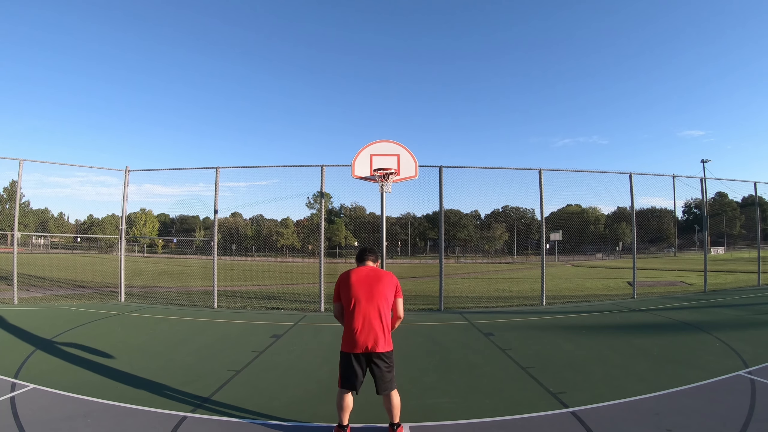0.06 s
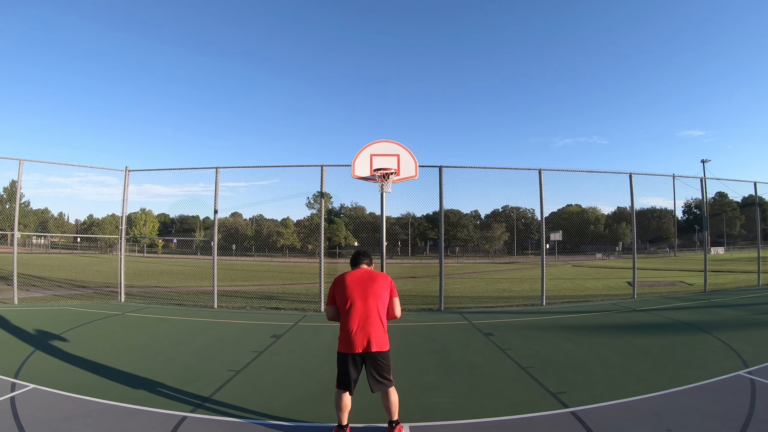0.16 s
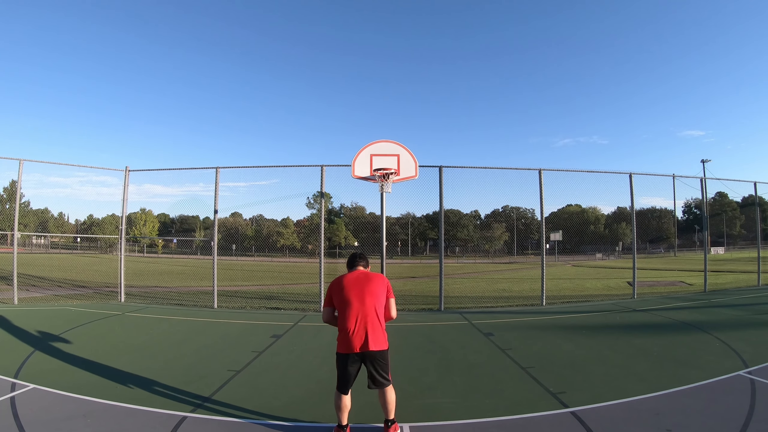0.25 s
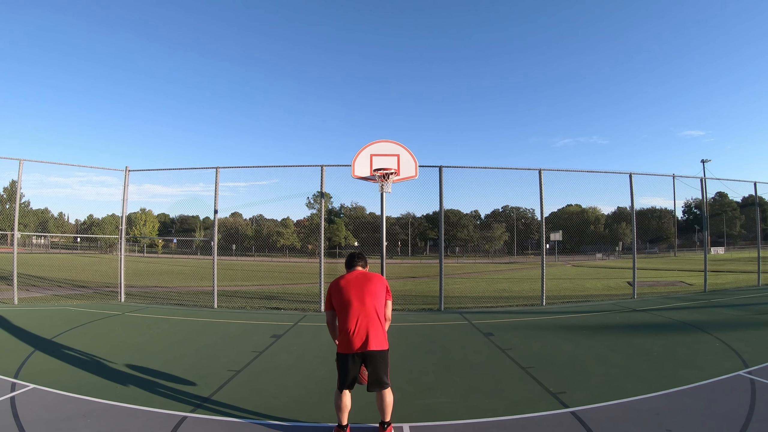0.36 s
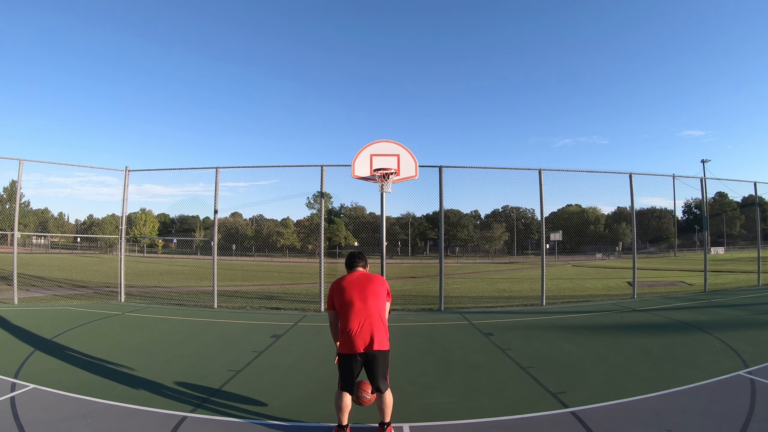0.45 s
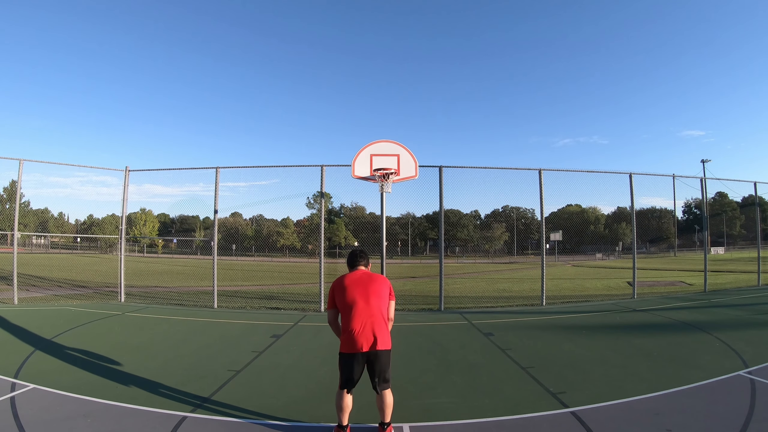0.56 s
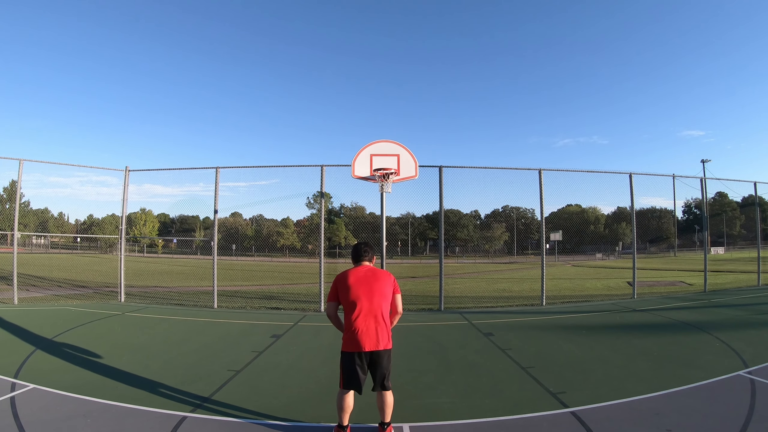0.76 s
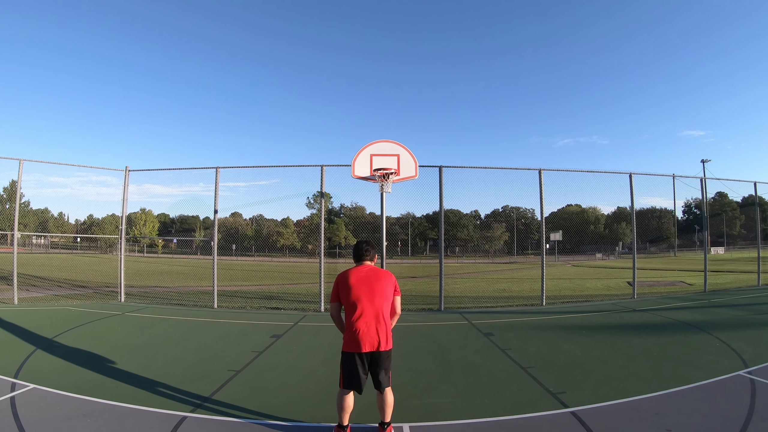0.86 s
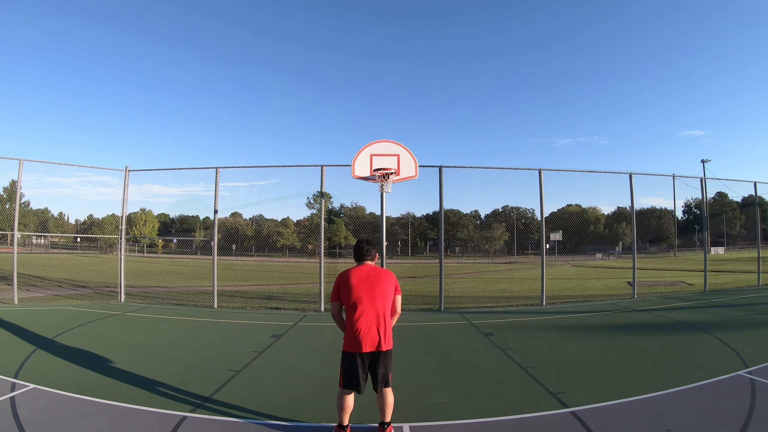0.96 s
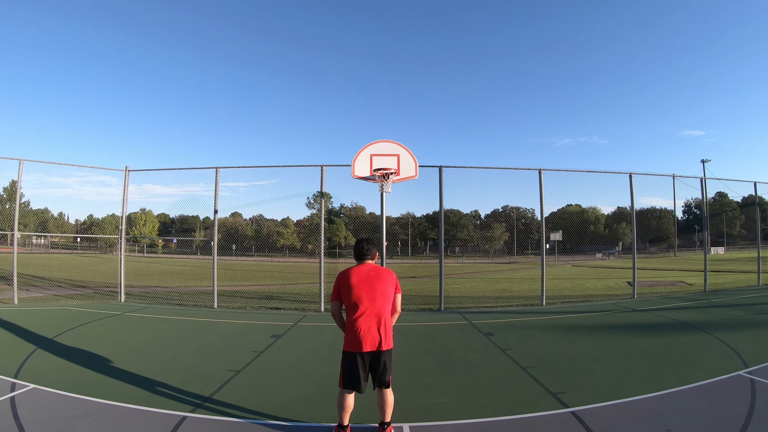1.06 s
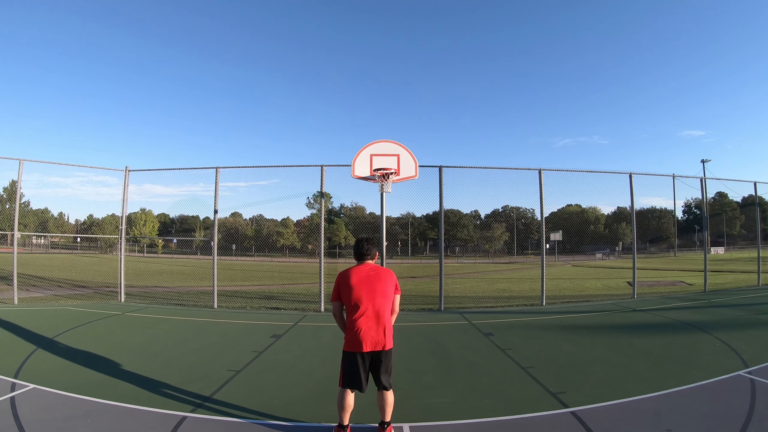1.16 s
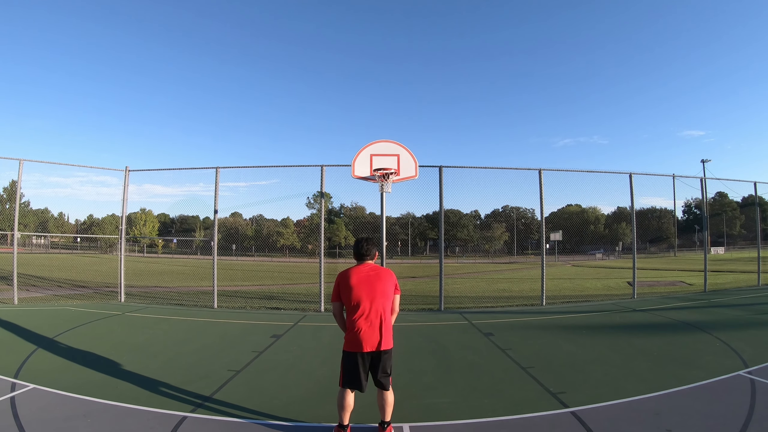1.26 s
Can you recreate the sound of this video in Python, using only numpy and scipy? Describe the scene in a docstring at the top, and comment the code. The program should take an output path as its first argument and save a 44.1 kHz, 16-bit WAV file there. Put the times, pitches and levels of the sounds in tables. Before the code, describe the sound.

A basketball bounces twice on a hard outdoor court a few metres away, at about 0.1 and 0.6 seconds. Each bounce is a sharp slap with a low thump, a faint hollow ping and a slight echo. Light wind rumbles and distant traffic hisses throughout. A very faint bird whistles in the first 0.3 seconds, and the player's movements rustle softly between and after the bounces.

```python
"""A sharp slap over light wind: a basketball bounces twice on a hard outdoor court, a few metres away.
Each bounce layers the slap with a two-cycle thump as the ball squashes and recovers, a buzz of the
skin and a faint ping of the air inside. Court and fence scatter the hit; a far surface returns the slap.
Behind it the wind rumbles, distant traffic hisses, a small bird whistles and the player softly shifts."""
import sys
import numpy as np
from scipy import signal
from scipy.fft import rfft, irfft
from scipy.io import wavfile

SR = 44100
rng = np.random.default_rng(int(sys.argv[2]) if len(sys.argv) > 2 else 0)


def output_pcm(signal):
    """Save a mono or channel-first signal as 16-bit PCM at the path in sys.argv[1].

    Samples are clipped to [-1, 1] before scaling.
    """
    pcm = np.clip(np.atleast_2d(signal).T, -1, 1) * 32767
    wavfile.write(sys.argv[1], SR, np.round(pcm).astype(np.int16))


N = 57330
T = np.arange(N) / SR

# Wind rumble, traffic drone and traffic hiss. Each row: frequency in Hz, relative noise density in dB.
WIND_COLOUR = [(15, -14), (38, 2.5), (62, 0.5), (100, -5), (165, -11), (230, -19.5), (320, -31.5),
               (500, -37.5), (900, -51), (3000, -93)]
DRONE_COLOUR = [(60, -10), (170, 4.5), (230, -1.5), (330, -9.5), (500, -13), (800, -19), (2000, -60.5)]
HISS_COLOUR = [(100, 3), (450, -22.5), (700, -7.5), (1100, 4), (1600, 2.5), (2200, -1.5), (3100, -9.5),
               (4000, -21), (5500, -28.5), (6600, -48.5), (8000, -37.5), (10000, -69), (15000, -48.5)]
# Fader moves for the gusts and the fading drone. Each row: time in seconds, level in dB.
WIND_FADER = [(0, -34.5), (.17, -38), (.26, -35), (.35, -32.5), (.45, -40.5), (.7, -33.5), (.87, -38.5),
              (1.3, -40)]
DRONE_FADER = [(0, -41), (.33, -44.5), (.6, -48.5), (.9, -56), (1.3, -53.5)]
# Bird calls. Each row: start and length in seconds, opening and top pitch in Hz, level in dB.
BIRD_WHISTLES = [(-.04, .14, 7300, 7850, -72), (.18, .15, 6650, 7100, -80)]
# Soft scuffs of shoes and hands. Each row: centre and width in seconds, level in dB.
RUSTLE_SWELLS = [(.36, .025, -69), (.645, .014, -65), (.845, .016, -68), (.88, .012, -68)]
# Those rustles, the ball's friction on the ground, and the reflections off court and fence.
# Each row: frequency in Hz, relative noise density in dB.
RUSTLE_COLOUR = [(500, -8.5), (3500, -2), (5500, 3.5), (7000, -13), (9000, -6.5), (11000, -32)]
SCUFF_COLOUR = [(200, 14), (600, -10.5), (1300, 1.5), (2200, -17.5), (3500, -19), (5000, -30.5),
                (7000, -31.5), (14000, -49.5)]
SCATTER_COLOUR = [(150, -12), (400, -2.5), (1200, -4), (3200, 4.5), (5500, 0.5), (8000, 12.5), (12000, 1.5)]
# Tone of the far echo and of the dull pop as the skin buckles. Each row: frequency in Hz, gain in dB.
ECHO_EQ = [(300, -14), (1200, -10), (2400, -3), (3300, 2), (4200, -1), (6000, -2), (8500, 8), (11000, -10)]
BUCKLE_EQ = [(100, -14), (300, -1), (800, 6), (1300, 4.5), (2400, 2), (3600, -6.5), (6000, -22.5),
             (12000, -58)]
# Air modes inside the ball, excited differently as it turns.
# Each row: frequency in Hz, level in dB at the first and at the second bounce, T60 in seconds.
AIR_MODES = [(1061, -52, -58, .4), (1141, -51, -57, .4), (1631, -55, -62, .3), (2130, -58, -56, .35),
             (2708, -62, -56, .35), (2803, -54, -53, .45), (2848, -61, -50, .52), (3176, -54, -60, .3),
             (3250, -62, -50, .22), (3435, -51, -57, .3), (3763, -54, -51, .25), (4334, -68, -61, .3)]
# Damped modes of the skin. Each row: frequency in Hz, relative level in dB, T60 in seconds.
SKIN_MODES = [(224, -31.5, .018), (425.5, -33, 0.069), (810, -41, 0.017), (1082, -36.5, 0.066),
              (1120, -35.5, 0.041), (1440, -27.5, 0.016), (1520, -36, 0.022), (1760, -30, 0.0051),
              (2390, -33, 0.0078), (3250, -29.5, .012), (3440, -48.5, 0.024)]
# Touch, buckle and lift-off each jolt the skin. Each row: delay after the slap in seconds,
# gain in dB, low-pass cutoff in Hz, share of the bounce's buckle dB added to that gain.
SKIN_JOLTS = [(.0001, -6, 6000, 0), (.0022, -4, 2600, 1), (.0108, 3, 1450, .3)]
# Tone of the slap, coloured by the spot that lands.
# Each row: frequency in Hz, gain in dB at the first and at the second bounce.
SLAP_EQ = [(203, -13.5, -12), (746, 8, 11.5), (1130, -17.5, 12.5), (1560, 18.5, 14.5), (2020, 5, 16),
           (2060, 8, 10.5), (2313, 15.5, 17), (2420, 9.5, 6.5), (3070, 13.5, 11.5), (3580, 12, 14),
           (3900, 5.5, 8.5), (5730, 1.5, 2.5), (6600, -10.5, -11), (9670, -20.5, -29), (11300, -38, -61),
           (14900, -57.5, -89)]
# The bounces. Each row: start in seconds, slap gain and thump gain in dB, buckle gain and echo send
# in dB (both on top of the slap gain), opening thump pitch in Hz.
BOUNCE_CUES = [(0.071, -1.5, -10.5, -6.5, -25.5, 135), (0.591, -2, -11.5, -5.5, -27.5, 128.4)]

HISS_DB = -48.5
GRAIN_DB, GRAINS_PER_S = 7.5, 190  # roughness of reflections and rustles
SCATTER_DB, SCATTER_DELAY_S, SCATTER_RISE_S, SCATTER_T60_S = -21, .019, .0073, .26
TAIL_DB, TAIL_T60_S = -26, 1.0
ECHO_DELAY_S, SMEAR_DECAY_S, SMEAR_DB = .1988, .004, -1
THUMP_ATTACK_S, THUMP_HOLD_S, THUMP_RELEASE_S, THUMP_SAG_HZ_PER_S = .0033, .0082, .0068, 2000
BUCKLE_DELAY_S, SCUFF_GAIN_DB, SCUFF_S = .0023, -19, .0175
MIC_TOP_HZ, STOPBAND_HZ = 10300, 13000


def from_db(db):
    """Decibels to gain."""
    return 10 ** (np.asarray(db) / 20)


def bin_gains(spectrum):
    """An EQ curve as a gain for each frequency bin."""
    hz, db = np.transpose(spectrum)
    bin_hz = np.arange(N // 2 + 1) * SR / N
    return from_db(np.interp(np.log(bin_hz + 1), np.log(hz), db))


def noise(spectrum):
    """Coloured noise of rms 1."""
    x = irfft(rfft(rng.standard_normal(N)) * bin_gains(spectrum), N)
    return x / x.std()


def grainy_noise(spectrum):
    """Coloured noise in small uneven clumps, rms 1."""
    clumps = np.interp(T * GRAINS_PER_S, np.arange(N), rng.standard_normal(N))
    x = noise(spectrum) * from_db(GRAIN_DB * clumps)
    return x / x.std()


def click(spectrum):
    """The tightest click with this spectrum: a minimum-phase pulse."""
    cepstrum = irfft(np.log(bin_gains(spectrum)), N)
    causal_window = np.r_[1, np.full(N // 2 - 1, 2), np.zeros(N - N // 2)]
    return irfft(np.exp(rfft(cepstrum * causal_window)), N)


def delay(x, seconds):
    """The same sound, later."""
    return np.r_[np.zeros(round(seconds * SR)), x][:N]


def convolve(x, response):
    """A sound played through an impulse response."""
    return signal.fftconvolve(x, response)[:N]


def lowpass(x, hz):
    """A gentle second-order treble roll-off."""
    return signal.sosfilt(signal.butter(2, hz, fs=SR, output="sos"), x + 1e-18)


def decay(t60):
    """A fade that falls 60 dB in t60 seconds."""
    return from_db(-60 * T / t60)


def fader(points):
    """A gain that rides through (seconds, dB) points."""
    return from_db(np.interp(T, *np.transpose(points)))


def ring(modes):
    """Struck modes, each a little stronger or weaker at every blow."""
    return sum(from_db(db + rng.standard_normal()) * np.sin(2 * np.pi * hz * T) * decay(t60)
               for hz, db, t60 in modes)


def traffic():
    """Distant traffic: a low, fading drone under a steady hiss."""
    return fader(DRONE_FADER) * noise(DRONE_COLOUR) + from_db(HISS_DB) * noise(HISS_COLOUR)


def wind():
    """A low rumble that swells with each gust."""
    return fader(WIND_FADER) * noise(WIND_COLOUR)


def bird():
    """Thin whistles that rise and level off."""
    out = np.zeros(N)
    for start, length, start_hz, top_hz, db in BIRD_WHISTLES:
        progress = np.clip((T - start) / length, 0, 1)
        hz = top_hz + (start_hz - top_hz) * (1 - progress) ** 3
        out += from_db(db) * np.sin(np.pi * progress) * np.sin(2 * np.pi * np.cumsum(hz) / SR)
    return out


def rustles():
    """Brief soft swells of friction as the player shifts."""
    swells = sum(from_db(db) * np.exp(-(2 * (T - centre) / width) ** 2)
                 for centre, width, db in RUSTLE_SWELLS)
    return swells * grainy_noise(RUSTLE_COLOUR)


def far_echo(x):
    """A far surface sends back a thin, slightly smeared copy."""
    smear = rng.standard_normal(N) * np.exp(-T / SMEAR_DECAY_S)
    smeared = x + from_db(SMEAR_DB) * convolve(x, smear / np.linalg.norm(smear))
    return delay(convolve(smeared, click(ECHO_EQ)), ECHO_DELAY_S)


def court_scatter(x):
    """A spray of small reflections off court and fence, then a faint long tail."""
    early = grainy_noise(SCATTER_COLOUR) * decay(SCATTER_T60_S) * np.minimum(T / SCATTER_RISE_S, 1)
    early *= from_db(SCATTER_DB) / np.linalg.norm(early)
    tail = noise(SCATTER_COLOUR) * decay(TAIL_T60_S)
    tail *= from_db(TAIL_DB) / np.linalg.norm(tail)
    return convolve(x, delay(early + tail, SCATTER_DELAY_S))


def thump(start_hz):
    """The low end: the ball squashes and recovers in about two cycles, sagging in pitch."""
    corners = np.cumsum([0, THUMP_ATTACK_S, THUMP_HOLD_S, THUMP_RELEASE_S])
    cycles = start_hz * T - THUMP_SAG_HZ_PER_S * T ** 2 / 2
    return -np.sin(2 * np.pi * cycles) * np.interp(T, corners, [0, 1, 1, 0])


def skin(buckle_db):
    """The skin buzzes at each stage of the contact, pops as it buckles and scuffs the ground."""
    buzz = sum(from_db(db + share * buckle_db) * delay(lowpass(ring(SKIN_MODES), cutoff_hz), lag)
               for lag, db, cutoff_hz, share in SKIN_JOLTS)
    pop = from_db(buckle_db) * delay(click(BUCKLE_EQ), BUCKLE_DELAY_S)
    scuff_fade = np.sqrt(np.clip(1 - T / SCUFF_S, 0, 1))
    scuff = from_db(SCUFF_GAIN_DB) * noise(SCUFF_COLOUR) * scuff_fade
    return buzz + pop + scuff


def basketball():
    """Each landing slaps, thumps and rings the air inside the ball; the surroundings answer."""
    out = np.zeros(N)
    for bounce, (start, slap_db, thump_db, buckle_db, echo_db, thump_hz) in enumerate(BOUNCE_CUES):
        crack = -click([(hz, levels[bounce]) for hz, *levels in SLAP_EQ])
        slap = from_db(slap_db) * (crack + skin(buckle_db))
        hit = slap + from_db(thump_db) * thump(thump_hz)
        ping = ring([(hz, levels[bounce], t60) for hz, *levels, t60 in AIR_MODES])
        reflections = court_scatter(hit) + from_db(echo_db) * far_echo(slap)
        out += delay(hit + ping + reflections, start)
    return out


def scene():
    """The mono mix: the ball up front, the outdoor bed behind it."""
    return (basketball() + rustles() + bird() + wind() + traffic())[None]


def record(dry):
    """The microphone softens the treble, and a steep filter cuts the very top."""
    top_cut = signal.cheby2(12, 70, STOPBAND_HZ, fs=SR, output="sos")
    return signal.sosfilt(top_cut, lowpass(dry, MIC_TOP_HZ))


dry = scene()
out = record(dry)
output_pcm(out)
```